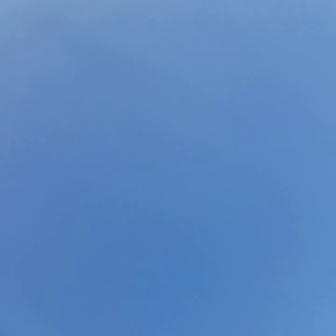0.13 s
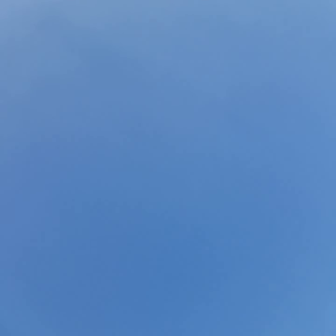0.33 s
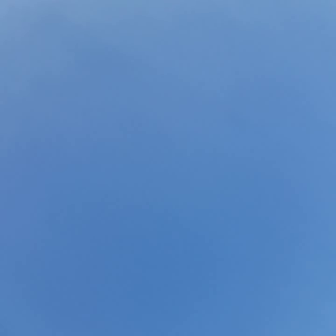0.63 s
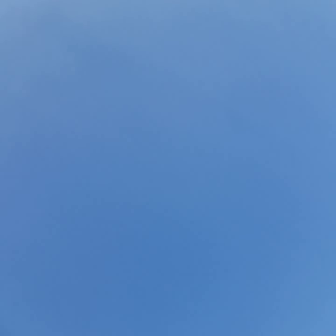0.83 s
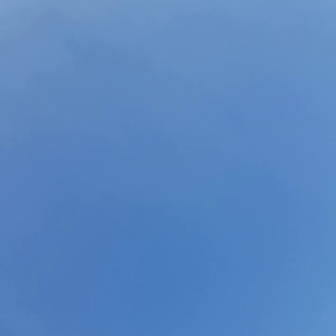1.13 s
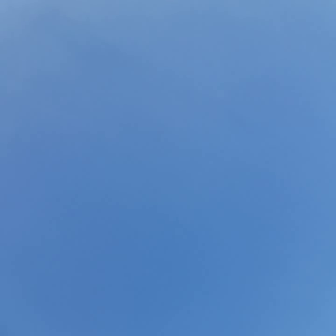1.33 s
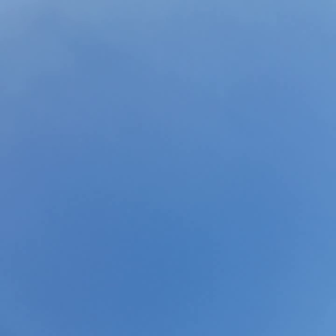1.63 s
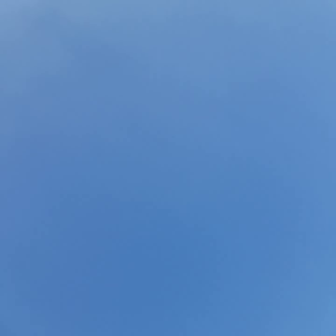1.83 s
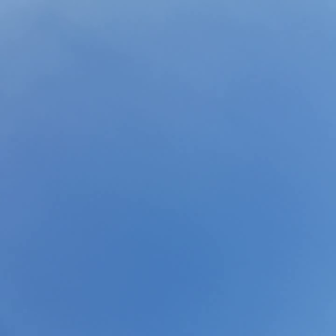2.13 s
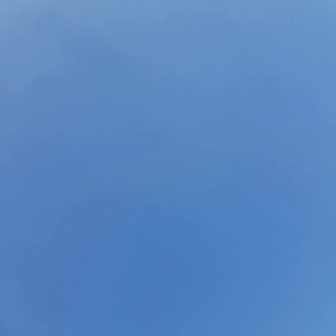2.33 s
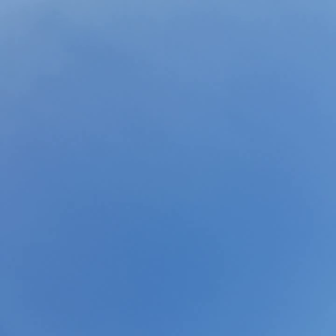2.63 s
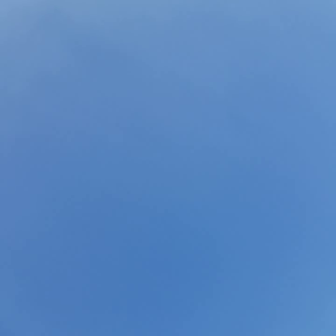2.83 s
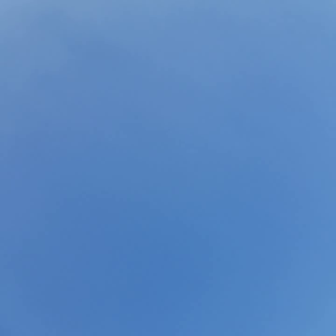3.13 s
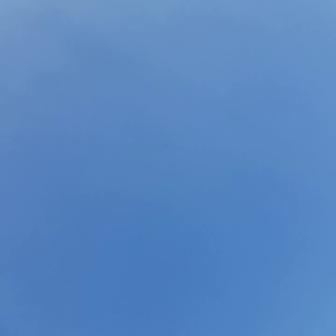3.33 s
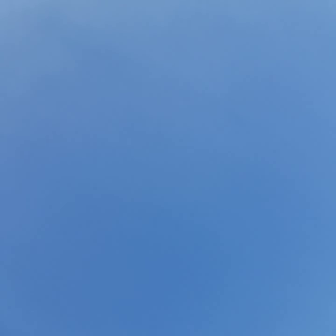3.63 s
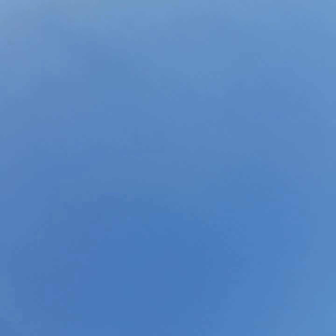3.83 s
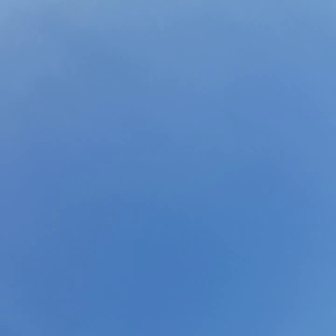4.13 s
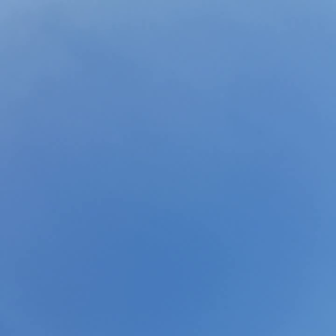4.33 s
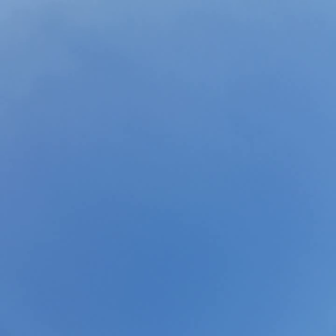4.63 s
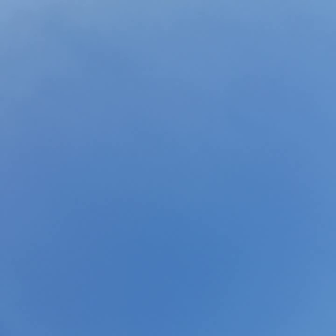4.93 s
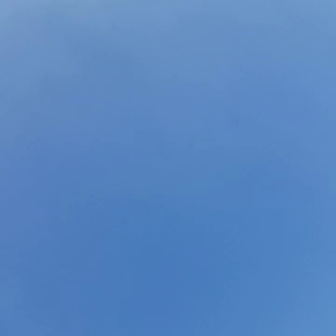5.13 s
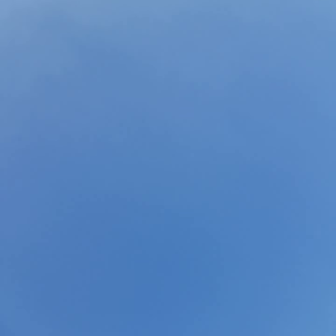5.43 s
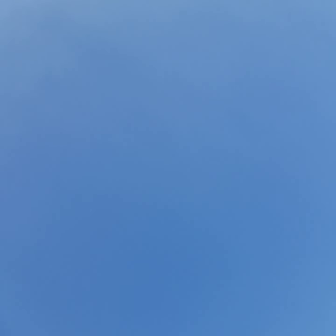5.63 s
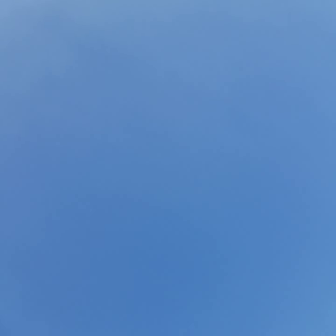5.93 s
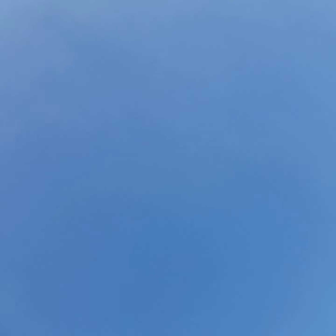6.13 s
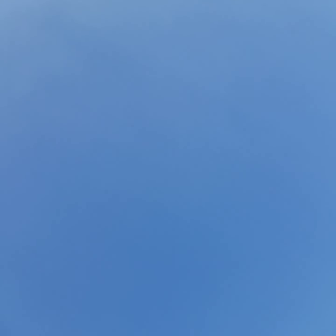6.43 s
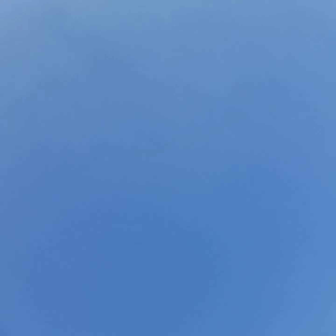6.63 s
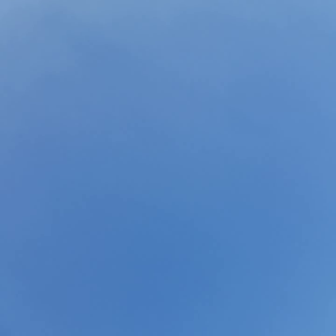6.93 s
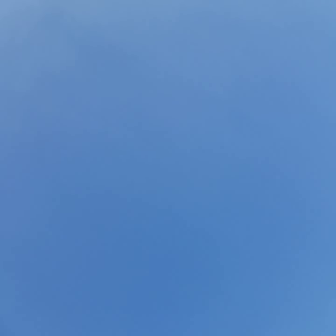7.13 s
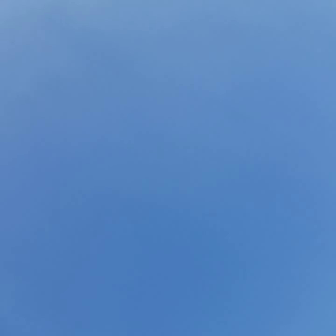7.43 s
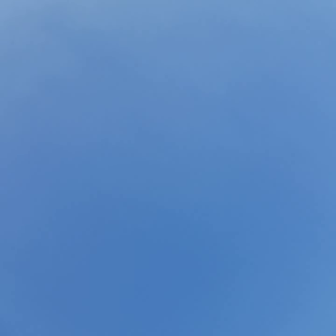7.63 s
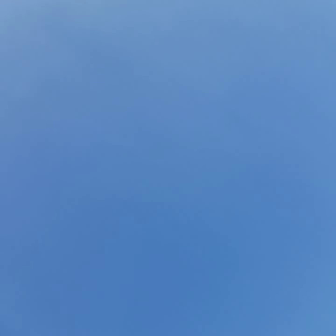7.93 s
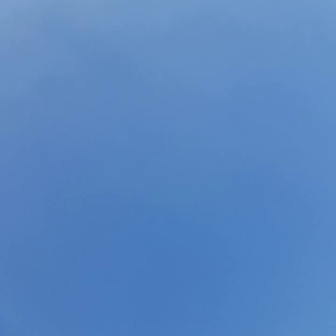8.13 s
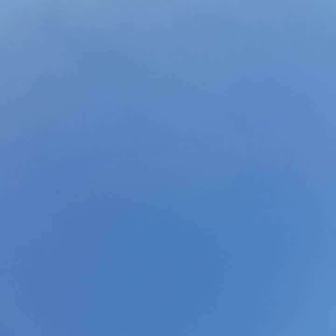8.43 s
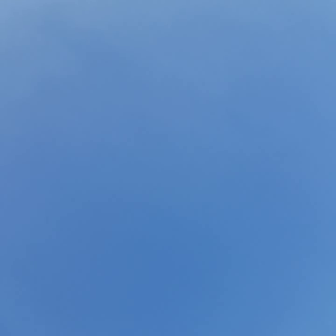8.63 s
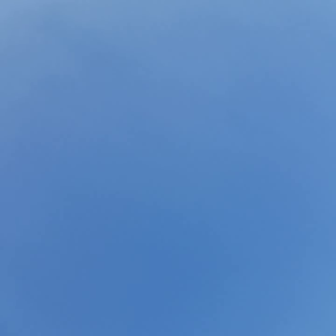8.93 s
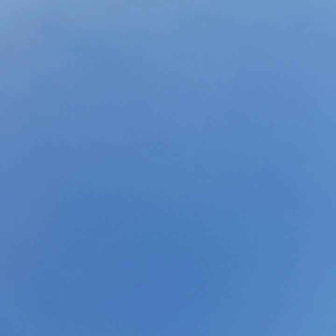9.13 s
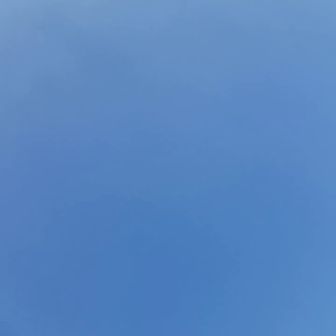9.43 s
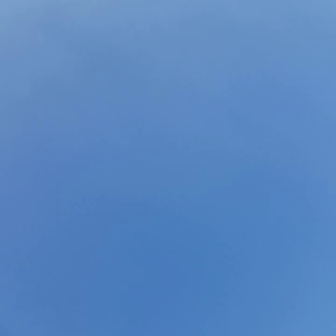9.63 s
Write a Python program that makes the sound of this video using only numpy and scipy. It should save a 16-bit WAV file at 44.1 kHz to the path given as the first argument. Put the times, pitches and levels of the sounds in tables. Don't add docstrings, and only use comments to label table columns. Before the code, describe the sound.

Outdoor birdsong at daybreak: flute-like notes, falling slides and high sharp phrases near and far, above a deep distant town drone.

```python
import sys
import numpy as np
from scipy import signal
from scipy.fft import rfft, irfft, next_fast_len
from scipy.io import wavfile
from scipy.ndimage import uniform_filter1d, map_coordinates

SR = 44100
rng = np.random.default_rng(int(sys.argv[2]) if len(sys.argv) > 2 else 0)


def output_pcm(signal):
    pcm = np.clip(np.atleast_2d(signal).T, -1, 1) * 32767
    wavfile.write(sys.argv[1], SR, np.round(pcm).astype(np.int16))


def magnitude_from_level(level_db):
    exponent = np.asarray(level_db, float) / 20
    return 10 ** exponent


N = 431298


def unit(x):
    return x / np.sqrt(np.mean(x ** 2) + 1e-20)


def along(points, hz):
    f, v = np.transpose(points)
    return np.interp(np.log(hz + 1), np.log(f + 1), v)


def wobble(rate, n=N):
    knots = rng.standard_normal(int(n * rate / SR) + 4)
    return map_coordinates(knots, [np.arange(n) * rate / SR])


def filtered(x, response):
    m = next_fast_len(N + 8192)
    return irfft(rfft(x, m) * response(np.fft.rfftfreq(m, 1 / SR)), m)[..., :N]


def rush(spectrum, patchy_db):
    z = signal.stft(rng.standard_normal((2, N)), nperseg=512)[2]
    field = uniform_filter1d(rng.standard_normal(z.shape[1:]), size=6, axis=0)
    field = uniform_filter1d(field, size=14, axis=1)
    pair = signal.istft(z * magnitude_from_level(patchy_db * unit(field)), nperseg=512)[1][:, :N]
    return unit(filtered(pair, lambda hz: magnitude_from_level(along(spectrum, hz))))


def add(out, s, length, start_hz, middle_hz, end_hz, db, pan_db, shake=0.003, shake_rate=150,
        flutter_db=3.0, edge=0.013, burr=0, warble=0, lag=None, path=None):
    n = int(length * SR)
    u = np.arange(n) / n
    hz = start_hz * (1 - u) * (1 - 2 * u) + 4 * middle_hz * u * (1 - u) + end_hz * u * (2 * u - 1)
    if path:
        hz = uniform_filter1d(np.interp(u * length, *np.transpose(path)), size=180, mode='nearest')
    hz = hz * (1 + warble * np.sin(2 * np.pi * 125 * u * length))
    phase = 2 * np.pi * np.cumsum(hz * (1 + shake * wobble(shake_rate, n))) / SR
    swell = np.sin(np.pi / 2 * np.clip(np.minimum(u, 1 - u) / edge, 0, 1)) ** 2
    swell *= 1 + burr * np.sin(2 * np.pi * 350 * u * length + 3.8 * wobble(59, n))
    tone = np.sin(phase) + magnitude_from_level(-42) * np.sin(2 * phase)
    note = magnitude_from_level(db + 6.5 + flutter_db * wobble(67.0, n)) * swell * tone
    lag = -4 * np.clip(pan_db, -5, 5) if lag is None else lag
    for ear, side in zip(out, (1, -1)):
        at = max(0, round(s * SR + side * lag / 2 + .25))
        ear[at:at + n] += magnitude_from_level(side * pan_db / 2) * note[:len(ear) - at]


def in_trees(x, wet_db, stretch=1.0):
    # pitch_hz, t60_s
    ringing = [(2500, 1), (8000, 0.66)]
    hz, t, z = signal.stft(rng.standard_normal((2, 3 * SR // 4)), SR, nperseg=256)
    lumps = magnitude_from_level(2 * rng.standard_normal(len(t)))
    decay = magnitude_from_level(-60 * t / (stretch * along(ringing, hz)[:, None])) + .6 * magnitude_from_level(-60 * t / .2)
    tail = signal.istft(z * lumps * decay, SR, nperseg=256)[1]
    sway = np.sqrt(2) * np.cos(1.5 * wobble(20) + np.pi / 4)
    source = np.pad(sway * (0.49 * x.mean(0) + 1.214 * x), ((0, 0), (300, 0)))
    echoes = signal.fftconvolve(source, tail / np.linalg.norm(tail[0]), axes=1)[:, :N]
    return x + magnitude_from_level(wet_db) * echoes


def gliders(swoops, dives, arches, pan_db, wet_db, shake=.004, lag=None):
    out = np.zeros((2, N))
    rows = []
    for notes, bend in ((swoops, .72), (dives, .27)):
        for s, length, a, b, db in notes:
            rows.append((s, length, a, a + bend * (b - a), b, db))
    for s, length, top_hz, under, db in arches:
        rows.append((s, length, (1 - under) * top_hz, top_hz, (1 - 1.7 * under) * top_hz, db))
    for row in rows:
        add(out, *row, pan_db, shake=shake, lag=lag, flutter_db=1.5, edge=.15)
    return in_trees(out, wet_db)


def hooks(notes, pan_db):
    out = np.zeros((2, N))
    rise_s = .034
    for s, length, top_hz, end_hz, db in notes:
        path = [(0, .64 * top_hz), (rise_s / 3, .87 * top_hz), (rise_s, top_hz),
                (.65 * length, .75 * end_hz + .25 * top_hz), (length, end_hz)]
        add(out, s, length, 0, 0, 0, db, pan_db, shake=0.008, flutter_db=3, edge=.08, path=path)
    return out


def town():
    # start_s, drone_db, traffic_db
    levels = [
        (0.0, -56, -54),
        (6.35, -56, -56),
        (6.73, -51.5, -54.5),
        (7.82, -59, -55.5),
        (9.02, -52, -57.5),
        (9.78, -58.5, -57.5),
    ]
    # start_s, left_over_right_db
    road_lean = [
        (1.3, 9),
        (1.7, -9),
        (7.3, -9),
        (7.7, 9),
    ]
    # pitch_hz, level_db per Hz
    traffic_spectrum = [(20, -29.5), (43, 6), (65, 10), (190, -17.5), (520, -15), (812, -11.5), (1500, -28),
                        (2300, -100)]
    # start_s, length_s, pitch_hz, level_db
    hum = [
        (0, 0.88, 544.4, -57.5),
        (0.097, 1.07, 454.4, -60.5),
        (5.092, 0.71, 550.6, -59.5),
    ]
    t = np.arange(N) / SR
    s, *columns = np.transpose(levels)
    drone_db, traffic_db = [np.interp(t, s, c) for c in columns]
    lean_db = np.interp(t, *np.transpose(road_lean))
    left, right = rush(traffic_spectrum, patchy_db=1.0)
    ports = 20
    ahead = magnitude_from_level(3.5) * left[::-1]
    wash = ahead + magnitude_from_level(lean_db / 2) * [left, np.roll(left, ports)]
    wash = wash + magnitude_from_level(-lean_db / 2) * [np.roll(right, ports), right]
    bass = filtered(wash, lambda hz: 1 / (1 + (hz / 130) ** 4))
    engine = np.sin(2 * np.pi * np.cumsum(58 + 3 * wobble(3.8)) / SR) * magnitude_from_level(2.9 * wobble(6))
    bass_width = unit(bass[0, ::-1]) * [[1], [-1]]
    drone = magnitude_from_level(drone_db) * (0.83 * unit(bass) + 0.11 * bass_width + 0.61 * unit(engine))
    tones = np.zeros(N)
    for start, length, hz, db in hum:
        fade = np.clip(np.minimum(t - start + 0.17, start + length - t) / 0.2, 0, 1)
        tones += magnitude_from_level(db + 2.0 * wobble(5.63)) * fade * np.sin(2 * np.pi * hz * t)
    return drone + tones + magnitude_from_level(traffic_db + 3.5) * unit(wash - bass)


def haze():
    # start_s, level_db
    haze_level = [(0, -66.5), (1.3, -66), (1.9, -73.5), (2.3, -68.5), (3.2, -67), (3.8, -64.5), (4.6, -66),
                  (5.1, -71), (5.5, -68), (6.2, -63.5), (6.65, -70.5), (7.1, -67), (7.8, -75.5),
                  (8.5, -69.5), (9.78, -66.5)]
    # pitch_hz, level_db per Hz
    far_spectrum = [(1300, -41), (1680, -6), (3490, -6.5), (4010, -8.5), (5720, -10), (7590, -9),
                    (9000, -19.5), (11700, -100)]
    level_db = np.interp(np.arange(N) / SR, *np.transpose(haze_level))
    return magnitude_from_level(level_db) * rush(far_spectrum, patchy_db=4)


def lisper():
    # start_s, lower_voice_hz, level_db
    lisps = [(0.005, 7780, -67), (0.105, 7370, -67.5), (0.235, 7640, -69), (0.5, 7290, -70),
             (0.997, 7560, -66.5), (1.154, 7810, -69.5), (1.365, 7540, -67.5), (1.82, 7550, -68.5),
             (2.031, 7740, -70), (2.638, 7770, -71), (2.872, 7790, -71), (3.003, 7680, -68),
             (3.165, 7550, -64.5), (3.54, 7110, -66.5), (3.915, 7480, -65.5), (4.322, 7580, -65.5),
             (4.888, 7700, -66), (5.025, 8000, -67), (5.154, 7650, -67), (5.42, 7370, -72.5),
             (5.648, 7300, -67), (5.735, 7840, -73.5), (6.62, 7780, -70), (6.745, 7780, -67.5),
             (6.878, 7730, -64), (6.985, 7530, -73), (7.515, 7790, -65), (7.765, 7540, -69),
             (8.08, 7410, -71.5), (8.19, 7670, -68), (8.41, 7450, -66.5), (8.815, 7270, -68),
             (9.17, 7440, -76), (9.432, 7430, -65.5), (9.552, 7350, -64.5)]
    out = np.zeros((2, N))
    for s, hz, db in lisps:
        add(out, s, .08, .99 * hz, hz, 1.022 * hz, db - 2.5, pan_db=.3, shake=.007, flutter_db=3)
        add(out, s + .012, .08, 1.04 * hz, 1.07 * hz, 1.1 * hz, db - 4, pan_db=.3, shake=.012, flutter_db=3)
    return in_trees(out, wet_db=1.5)


def slider():
    # start_s, level_db, growth_db a note
    runs = [
        (0.028, -59.5, -0.2),
        (8.633, -59, 1),
    ]
    # start_s, level_db
    slow_slides = [
        (7.805, -62),
        (8.283, -58),
    ]
    out = np.zeros((2, N))
    lag = -21
    for start, first_db, growth_db in runs:
        for k in np.arange(5):
            s = start + k * .272
            db = first_db + k * growth_db + 1.5
            add(out, s, .058, 5400, 4050, 3250, db, pan_db=-3, flutter_db=1.5, edge=.3, lag=lag)
            add(out, min(s + .056, 9.77), .03, 3150, 2300, 2150, first_db - 4, pan_db=-3, shake=.004,
                edge=.2, lag=lag)
    for s, db in slow_slides:
        add(out, s, .074, 4520, 3880, 3280, db, pan_db=-4.0, shake=0.0046, flutter_db=1.0, edge=0.24, lag=lag)
        add(out, s + .097, .027, 2800, 2350, 2200, db - 4.0, pan_db=-5, shake=0.0037, edge=0.066, lag=lag)
    return in_trees(out, wet_db=-8.5, stretch=0.75)


def whistlers():
    # start_s, length_s, pitch_hz, level_db, left_over_right_db
    held = [(0.089, 0.022, 6530, -56.5, -5), (0.17, 0.11, 2560, -60, -6), (0.715, 0.016, 2580, -56.5, -5),
            (3.497, 0.04, 3960, -46.5, -5), (3.799, 0.15, 3157, -59, 4), (3.802, 0.036, 6360, -57, 0),
            (3.897, 0.126, 2419, -51, -1.5), (4.655, 0.12, 2570, -52, 1), (6.185, 0.12, 3132, -58, -1.5),
            (6.231, 0.04, 4550, -59, 4), (6.43, 0.026, 5320, -54, 1.5), (6.366, 0.043, 1610, -58, -5),
            (7.59, 0.023, 1880, -62.5, -12), (8.571, 0.086, 6120, -48, -0.5),
            (9.65, 0.026, 3044, -54, -1.5)]
    perches = np.zeros((2, 2, N))
    for k, (s, length, hz, db, pan_db) in enumerate(held):
        add(perches[k % 2], s, length, 1.015 * hz, hz, .997 * hz, db - 3, pan_db, shake=.009,
            flutter_db=3.5, edge=.18)
    return sum(in_trees(perch, wet_db=-3.0) for perch in perches)


def ahead_gliders():
    # start_s, length_s, start_hz, end_hz, level_db
    swoops = [
        (0.1, 0.033, 7000, 8100, -61),
        (4.172, 0.014, 3150, 2800, -63.5),
        (5.1, .03, 2300, 2080, -62.5),
        (4.345, 0.028, 6150, 7500, -52),
        (5.19, 0.0347, 2150, 2620, -55.5),
        (5.255, 0.018, 2400, 2700, -60),
        (8.327, .05, 5800, 6200, -50.5),
        (.845, .05, 2500, 3100, -69),
        (9.74, 0.032, 2000, 3020, -58),
    ]
    dives = [
        (0.895, 0.022, 2850, 2220, -67),
        (4.47, 0.091, 2450, 2940, -64.5),
        (3.419, 0.06, 5150, 4880, -53.5),
        (5.128, 0.017, 2210, 1850, -55.5),
        (5.222, 0.03, 2610, 2050, -55),
        (7.168, 0.077, 4414, 3640, -52.5),
        (8.375, 0.0258, 6220, 7030, -42.5),
        (8.642, 0.031, 7770, 6450, -51),
        (9.695, 0.034, 3070, 2050, -55.5),
    ]
    # start_s, length_s, top_hz, start_under_top share, level_db
    arches = [
        (1.243, 0.062, 2464, 0.129, -57),
        (5.306, 0.25, 3407, 0.14, -63),
    ]
    return gliders(swoops, dives, arches, pan_db=-3.5, wet_db=-4.5, lag=16)


def right_gliders():
    # start_s, length_s, start_hz, end_hz, level_db
    swoops = [
        (0.301, 0.045, 3180, 2800, -62.5),
        (0.615, 0.041, 2640, 2160, -65),
        (4.062, 0.016, 5800, 7900, -55.5),
        (4.585, 0.044, 1830, 2180, -73),
        (4.65, 0.077, 1966, 1720, -57),
        (5.858, 0.039, 1550, 1976, -53),
        (7.018, 0.079, 2100, 3214, -57),
        (8.975, 0.043, 2310, 2340, -58),
        (9.13, 0.05, 2180, 2600, -74),
        (9.184, 0.013, 2010, 1710, -60),
    ]
    dives = [(0.101, 0.02, 6400, 5560, -61), (0.68, 0.035, 2366, 1960, -58.5),
             (0.825, 0.02, 2190, 2870, -60.5), (0.977, 0.026, 2846, 1700, -57),
             (1.149, 0.052, 2600, 2090, -55.5), (1.454, 0.019, 2795, 1680, -57.5),
             (2.594, 0.032, 2090, 1590, -62), (3.131, 0.04, 2070, 1700, -62.5),
             (5.925, 0.012, 2190, 1750, -64), (6.066, 0.029, 2744, 1970, -58),
             (6.434, 0.0195, 1883, 1610, -57), (4.622, 0.036, 2170, 1960, -66),
             (7.088, 0.018, 3160, 2230, -54.5), (7.408, 0.1, 2766, 2370, -69),
             (9.22, 0.11, 2495, 2060, -60)]
    return gliders(swoops, dives, [], pan_db=-7, wet_db=-2)


def piper():
    # start_s, pitch_hz, level_db
    pipes = [(0.199, 1850, -59), (0.467, 1843, -59), (0.743, 1837, -61.5), (1.02, 1776, -61.5),
             (7.72, 1920, -63), (8.185, 1902, -62), (8.545, 1954, -59.5), (8.805, 1938, -57.5),
             (9.081, 1930, -55), (9.36, 1910, -58.5), (9.63, 1900, -59)]
    out = np.zeros((2, N))
    length, sag = .09, 0.94
    for s, hz, db in pipes:
        add(out, s - length / 6, length, sag * hz, hz, sag * hz, db - 3, pan_db=-1.5, shake=.004,
            flutter_db=2, edge=.45)
    return in_trees(out, wet_db=-8, stretch=0.73)


def buzzers():
    # start_s, length_s, pitch_hz, warble_depth share, level_db
    buzzes = [
        (0.553, 0.12, 6500, 0.059, -71.5),
        (1.159, 0.044, 6950, 0.057, -64.5),
        (4.86, 0.08, 5260, 0.045, -68.5),
        (5.804, 0.037, 2555, 0.12, -52.5),
        (7.106, 0.12, 3003, 0.053, -62),
        (7.215, 0.1094, 4146, 0.035, -60.5),
        (8.397, 0.13, 6180, 0.1, -54.5),
        (9.045, 0.05, 2553, 0.086, -51),
    ]
    out = np.zeros((2, N))
    for s, length, hz, depth, db in buzzes:
        add(out, s, length, 1.014 * hz, hz, 0.986 * hz, db - 2.5, pan_db=-2, shake=0.683 * depth,
            shake_rate=320, flutter_db=0.5, edge=0.031)
    return in_trees(out, wet_db=3.0)


def far_gliders():
    # start_s, length_s, start_hz, end_hz, level_db
    swoops = [(1.31, 0.045, 3500, 4150, -77), (1.38, 0.17, 5240, 5100, -80), (1.55, 0.17, 3750, 4000, -85),
              (1.805, .012, 5600, 7500, -67.5), (1.908, .012, 5600, 7600, -69),
              (2.015, .012, 5500, 7560, -64), (2.368, 0.011, 5500, 7600, -67),
              (4.475, 0.093, 3790, 4230, -70), (4.5, 0.044, 3700, 3760, -71),
              (4.58, .07, 3850, 4340, -66.5), (4.8, 0.0115, 6870, 5680, -59), (6.76, .028, 2480, 4180, -65),
              (6.76, 0.011, 7240, 5520, -53.5), (6.768, 0.013, 6400, 5640, -61.5),
              (8.272, .016, 7440, 6040, -52.5)]
    dives = [
        (4.816, .045, 4420, 5800, -66.5),
        (5.56, .05, 7010, 5200, -55.5),
        (7.216, 0.014, 4180, 7300, -64.5),
        (7.32, .016, 4000, 5620, -68),
        (9.015, 0.024, 2450, 3870, -56.5),
    ]
    return gliders(swoops, dives, [], pan_db=-0.5, wet_db=2, shake=.015)


def flicker():
    # start_s, length_s, whistle_hz, whistle_db, flicks_db
    flicked = [
        (2.076, 0.1, 3460, -62, -53),
        (2.412, .15, 3523, -59.5, -52.5),
        (2.681, 0.14, 3527, -57, -52),
    ]
    whistle, high, low = np.zeros((3, 2, N))
    for s, length, hz, db, flick_db in flicked:
        add(whistle, s, length, hz, hz, hz, db - 3, pan_db=-.5, shake=.004, flutter_db=3, edge=.3)
        add(high, s + .069, .027, 5900, 7450, 7850, flick_db - 5, pan_db=-9, flutter_db=1, edge=.25, lag=13)
        add(low, s + .108, .007, 3900, 4550, 5330, flick_db - 1, pan_db=-2.5, flutter_db=.5, edge=.3)
    flicks = in_trees(high, wet_db=-8.5, stretch=0.75) + in_trees(low, wet_db=0.5)
    return in_trees(whistle, wet_db=1.0) + flicks


def triller():
    out = np.zeros((2, N))
    for k in np.arange(13):
        s = 2.335 + k * .1205 + k * k * .0001
        db = -64.5 - 7 / (1 + np.exp(k - 1))
        add(out, s, .036, 4850, 5800, 7400, db, pan_db=2.5, shake=.006, flutter_db=3, edge=.35, lag=-7)
    return in_trees(out, wet_db=0.5)


def rasper():
    # start_s, length_s, lowest_hz, spacing_hz, level_db
    rasps = [
        (2.896, .4, 3927, 381, -65),
        (4.473, 0.13, 5620, 351, -68.5),
    ]
    out = np.zeros((2, N))
    for s, length, low_hz, spacing_hz, db in rasps:
        for k in np.arange(4):
            hz = low_hz + k * spacing_hz
            add(out, s, length, hz, hz, hz, db - 2.5 * k, pan_db=-2, shake=.018, shake_rate=200,
                flutter_db=2, edge=0.03)
    return in_trees(out, wet_db=-1)


def warbler():
    # start_s, length_s, pitch_hz, depth share, level_db
    warbles = [
        (3.63, 0.12, 2550, 0.078, -58),
        (7.632, .018, 1880, 0.093, -56.5),
        (7.86, 0.02, 1900, 0.14, -54.5),
        (7.808, .016, 1900, .06, -53.5),
    ]
    out = np.zeros((2, N))
    for s, length, hz, depth, db in warbles:
        add(out, s, length, hz, hz, hz, db, pan_db=-4, shake=0.015, flutter_db=0.0, edge=0.31, warble=depth)
    return in_trees(out, wet_db=-1)


def burred_whistler():
    # start_s, length_s, pitch_hz, level_db
    burred = [
        (3.869, 0.091, 4760, -42.5),
        (4.128, 0.09, 4787, -44),
        (4.398, 0.094, 4728, -44),
    ]
    out = np.zeros((2, N))
    for s, length, hz, db in burred:
        add(out, s, length, 1.025 * hz, hz, hz, db - 3, pan_db=-1.5, shake=.006, flutter_db=1,
            edge=.2, burr=.32)
    return in_trees(out, wet_db=-2.5)


def settlers():
    # start_s, length_s, start_hz, end_hz, level_db
    settles = [
        (4.242, 0.097, 3250, 2142, -62),
        (4.785, 0.093, 3500, 2890, -62.5),
        (6.986, .05, 3940, 3390, -61),
        (7.242, .036, 8550, 6350, -50.5),
    ]
    out = np.zeros((2, N))
    for s, length, start_hz, end_hz, db in settles:
        t = np.linspace(0, length, num=9)
        hz = end_hz + (start_hz - end_hz) * np.exp(-t / (.27 * length))
        add(out, s, length, 0, 0, 0, db, pan_db=-3, shake=0.0053, flutter_db=3, edge=0.22, lag=15.6,
            path=list(zip(t, hz)))
    return in_trees(out, wet_db=-3.5)


def far_hooker():
    # start_s, length_s, top_hz, end_hz, level_db
    far_hooks = [
        (5.203, 0.15, 5020, 5050, -68),
        (6.1, 0.064, 4550, 4590, -55.5),
    ]
    return in_trees(hooks(far_hooks, pan_db=1.5), wet_db=4.5)


def near_singer():
    # start_s, length_s, top_hz, end_hz, level_db
    near_hooks = [
        (5.652, 0.14, 6520, 5930, -49),
        (5.914, 0.16, 6540, 6120, -42.5),
        (6.187, 0.1, 6900, 6230, -41),
        (6.455, 0.098, 6650, 6796, -47),
    ]
    # start_s, length_s, crest_hz, end_hz, level_db
    zigzags = [
        (5.802, 0.085, 7120, 4780, -44.5),
        (6.077, 0.073, 7490, 5070, -41.5),
        (6.34, 0.094, 7210, 5200, -44.5),
    ]
    # time_s after its start, pitch_hz
    bow = [
        (0, 6150),
        (.03, 6450),
        (.06, 6790),
        (.09, 6850),
        (.13, 6450),
        (0.196, 5550),
    ]
    out = hooks(near_hooks, pan_db=4.5)
    add(out, 5.322, bow[-1][0], 0, 0, 0, -48, pan_db=-3, shake=0.006, flutter_db=3.0, edge=0.27, path=bow)
    dip_s, dip_hz, crest_s, leave_s = .021, 5850, .028, .039
    for s, length, crest_hz, end_hz, db in zigzags:
        path = [(0, 8200), (dip_s / 3, 1.17 * dip_hz), (dip_s, dip_hz), (crest_s, crest_hz),
                (leave_s, crest_hz), ((leave_s + length) / 2, crest_hz + .72 * (end_hz - crest_hz)),
                (length, end_hz)]
        add(out, s, length, 0, 0, 0, db, pan_db=3.5, shake=0.0036, flutter_db=2.5, edge=0.05, lag=-20, path=path)
    return in_trees(out, wet_db=-4.5)


def scene():
    birds = lisper() + slider() + whistlers() + ahead_gliders() + right_gliders() + piper() + buzzers()
    birds += far_gliders() + flicker() + triller() + rasper() + warbler() + burred_whistler()
    birds += settlers() + far_hooker() + near_singer()
    return town() + haze() + birds


def gated(x):
    # pitch_hz, level_db
    gate_floor = [(1500, -112), (3000, -104), (6000, -103), (8000, -100), (9000, -105)]
    hz, _, z = signal.stft(x, SR, nperseg=2048)
    power = np.mean(abs(z[:, :1024].reshape(2, 128, 8, -1)) ** 2, axis=(0, 2))
    loudest = power[8:].max(0)
    floor = magnitude_from_level(2 * along(gate_floor, hz[4:1024:8]))[:, None]
    keep = power > floor + magnitude_from_level(-79) * loudest
    keep = np.vstack([np.repeat(keep, 8, axis=0), keep[-1:]])
    keep = keep | (hz > 10500)[:, None]
    return signal.istft(z * keep, SR, nperseg=2048)[1][:, :N]


def microphone_hiss():
    # pitch_hz, level_db per Hz
    hiss_spectrum = [(5880, -33), (10000, -6.5), (11800, -4), (15100, -1.5), (15600, 0.5)]
    hiss = magnitude_from_level(-70.5) * rush(hiss_spectrum, patchy_db=-1.5)
    return filtered(hiss, lambda hz: 1 / (1 + (10300 / (hz + 1)) ** 30))


def band_limit(x):
    return signal.sosfilt(signal.butter(12, 15710, fs=SR, output="sos"), x)


def record(dry):
    # pitch_hz, level_db
    gap_response = [(7800, 0), (8500, -6), (9000, -24), (9400, -60), (11000, -40), (12000, 0)]
    heard = gated(filtered(dry, lambda hz: magnitude_from_level(along(gap_response, hz))))
    return band_limit(heard + microphone_hiss())


dry = scene()
out = record(dry)
output_pcm(out)
```